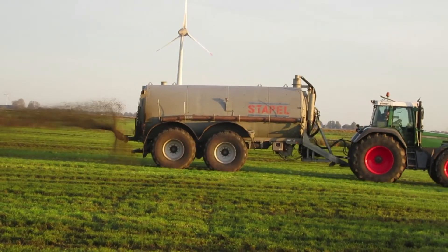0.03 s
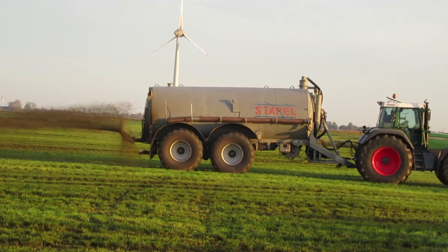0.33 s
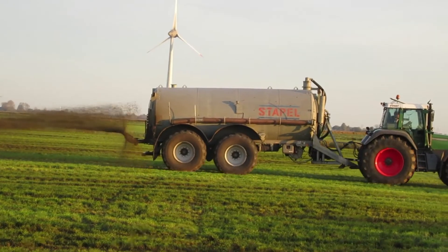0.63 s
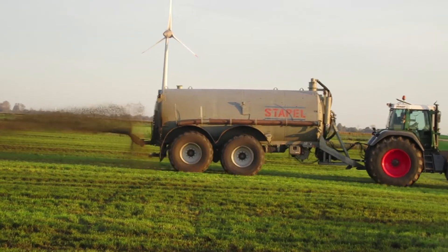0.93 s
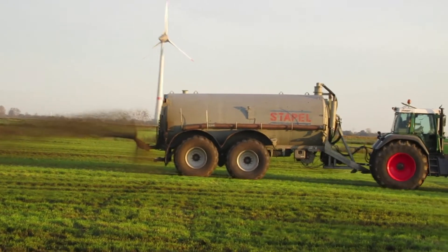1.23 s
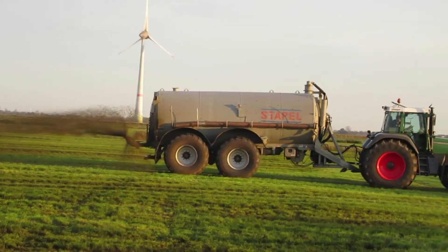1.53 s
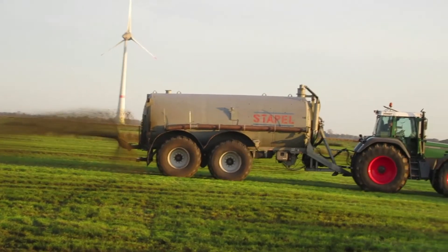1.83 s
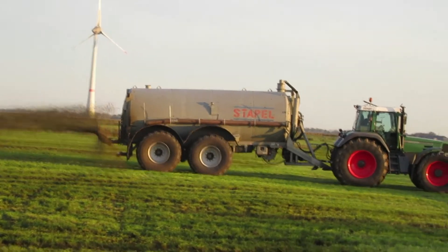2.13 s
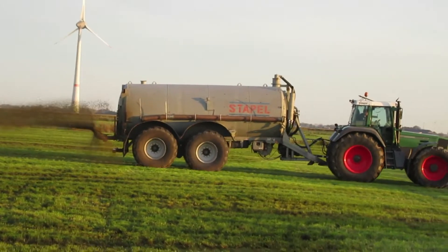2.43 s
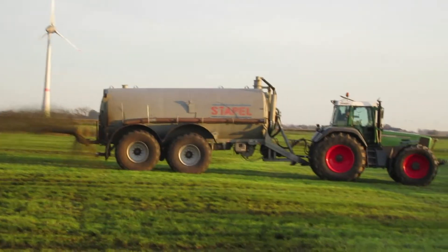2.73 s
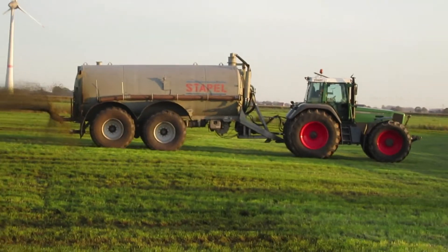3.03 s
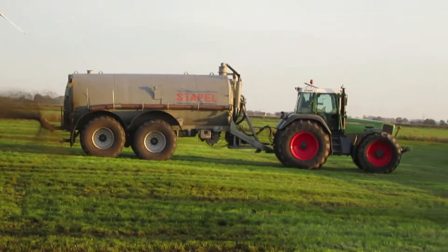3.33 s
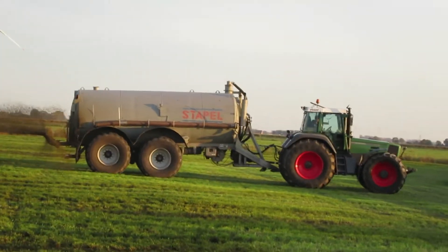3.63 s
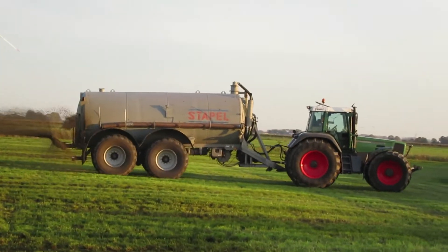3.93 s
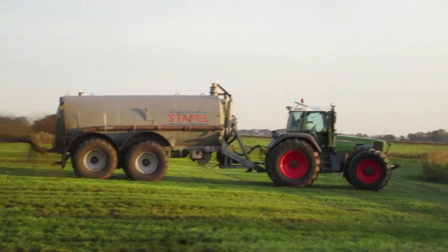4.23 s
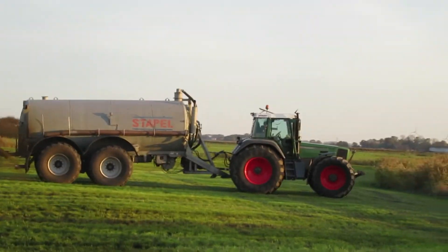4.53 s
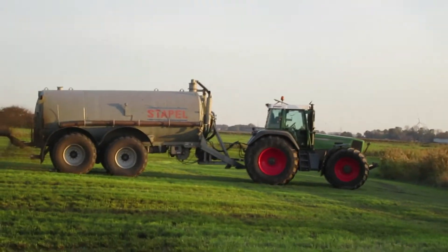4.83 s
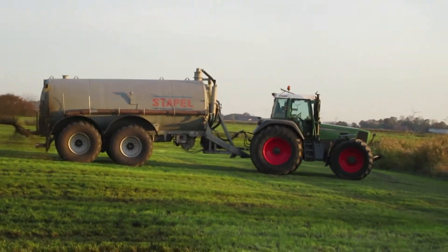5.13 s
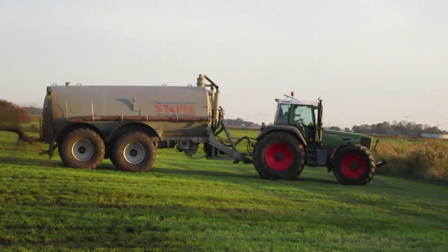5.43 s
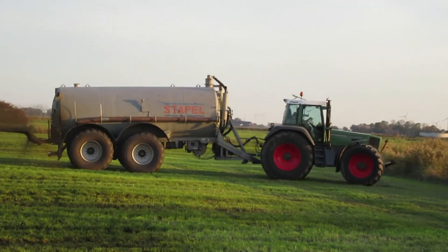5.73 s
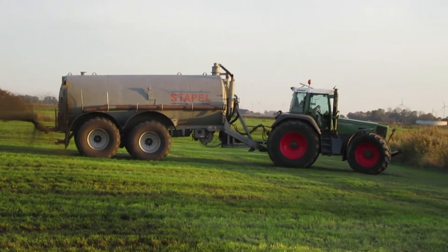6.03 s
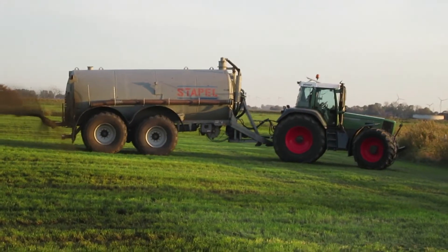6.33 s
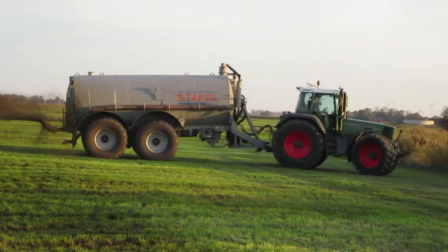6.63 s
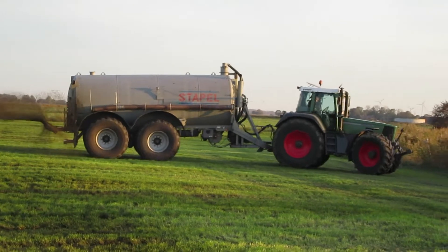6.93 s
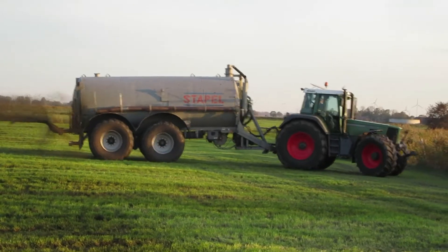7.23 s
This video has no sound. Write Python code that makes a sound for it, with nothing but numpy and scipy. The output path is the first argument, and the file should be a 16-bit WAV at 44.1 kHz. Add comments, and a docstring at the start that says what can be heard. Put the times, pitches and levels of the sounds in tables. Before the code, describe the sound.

Outdoors in a field, wind tumbles over the microphone in irregular gusts, rumbling and popping from start to finish. Behind it a tractor's diesel engine holds an even, rattling drone, with humming pump tones, gear whine that swells and fades, and the soft hiss of a tanker spraying slurry. Small close rustles and ticks appear now and then, and the strongest wind thumps make the level dip for a moment.

```python
"""Diesel clatter, pump hum, gear whine and spray hiss: a six-cylinder tractor pulls a slurry tanker
across a field at steady throttle. Firings rattle the block; the tones are locked to the crankshaft.
Wind eddies tumble over the microphone as gusts, rumble and pops; something rustles and ticks close by.
The hardest pops make a limiter duck everything, and the level creeps back up."""
import sys
import numpy as np
from scipy import signal
from scipy.fft import rfft, irfft, next_fast_len
from scipy.io import wavfile
from scipy.ndimage import uniform_filter1d, map_coordinates

SR = 44100
rng = np.random.default_rng(int(sys.argv[2]) if len(sys.argv) > 2 else 0)


def master_out(mix):
    """Clip the mix to full scale and print it as 16-bit PCM to the path in sys.argv[1]."""
    frames = np.transpose(np.atleast_2d(mix))
    ceiling = np.clip(frames, -1, 1)
    pcm = np.round(ceiling * 32767).astype(np.int16)
    wavfile.write(sys.argv[1], SR, pcm)


N = 330309

# Governed engine speed. Each row: time in seconds, speed in rpm.
ENGINE_RPM = [(0, 2086), (.4, 2087), (.75, 2069), (2.25, 2080), (3.1, 2069), (3.9, 2078), (5.5, 2072),
              (6, 2083), (6.8, 2063), (7.49, 2071)]
# Clatter loudness. Each row: time in seconds, relative level in dB.
CLATTER_DB = [(0, -43.5), (.7, -42.5), (1.2, -39.5), (1.75, -44.5), (2.5, -42), (3.3, -42), (3.85, -44),
              (5, -42.5), (6.1, -43.5), (6.5, -42.5), (7, -40.5), (7.49, -44.5)]
# Engine block response. Each row: frequency in Hz, gain in dB.
BLOCK_COLOUR = [(60, -2), (200, 14.5), (500, 2.5), (750, -0.5), (1000, 2), (1600, -2.5), (2400, -3.5),
                (3800, -12), (6000, -14), (8400, -25.5), (9800, -26.5), (11200, -37), (13300, -40.5),
                (15000, -51)]
# Ringing panels and pipes. Each row: centre in Hz, width in Hz, boost in dB.
PANEL_MODES = [(1800, 97, 4), (2340, 200, 3), (2820, 92, 5), (3047, 87, 6), (3440, 91, 3.5), (4590, 290, 5)]
# Vacuum pump and exhaust tones. Each row: periods per engine cycle, relative level in dB.
DRONE_TONES = [(4.5, -30.5), (6, -40), (9, -37.5), (13.5, -41), (18, -43), (30, -42), (31, -41.5),
               (35, -48.5), (36, -50.5), (54, -52), (57, -49.5), (58, -52.5), (101.5, -57), (125.5, -57)]
# Drone loudness. Each row: time in seconds, gain in dB.
DRONE_GAIN_DB = [(0, -6), (6.2, -4), (6.9, -3)]
# Low, middle and high gear mesh. Each row: periods per engine cycle, swell depth as a fraction.
GEAR_MESHES = [(56, .4), (83, .28), (111.3, .68)]
# Each mesh beams its own way in passing. Each row: time in seconds, low, middle, high in relative dB.
MESH_DB = [(0, -53, -50, -49.5), (.55, -51.5, -51, -45), (.8, -46, -48, -47.5), (1.12, -45.5, -47.5, -41),
           (1.9, -47, -54, -54), (2.35, -54, -57, -47.5), (3.1, -48.5, -49, -48.5), (4.201, -45, -50, -61),
           (4.9, -42, -45, -55), (5.8, -52, -57, -49.5), (6.6, -44, -42, -50.5), (7.49, -51, -48.5, -54)]
# Tanker hiss. Each row: time in seconds, spray level in dB, pump pipe level in dB.
HISS_DB = [(0, -56, -57), (.6, -52, -64), (1.15, -44.5, -53), (1.7, -57, -57), (2.5, -55, -53),
           (3.3, -49, -62), (4.1, -52.5, -57), (4.8, -51.5, -47), (5.3, -61, -54), (6.3, -52, -58),
           (7.49, -54.5, -49.5)]
# Spray and pump pipe spectra. Each row: frequency in Hz, gain in dB.
SPRAY_COLOUR = [(1500, -24), (3000, -1), (4000, -2), (4650, 1.5), (5300, -2), (7000, -19), (11000, -45),
                (15000, -56.5)]
PIPE_COLOUR = [(1800, -39.5), (2350, -7), (2510, 5.5), (2680, -10), (3400, -37), (12000, -64)]
# Breeze between gusts. Each row: time in seconds, level in dB.
BREEZE_DB = [(0, -30.5), (.45, -24), (1.6, -26), (2.6, -22.5), (3.15, -30), (3.6, -27), (4.3, -30.5),
             (5.15, -33.5), (5.7, -27), (6.5, -28.5), (7.1, -37.5), (7.49, -28.5)]
# Gusts. Each row: start in seconds, hold in seconds, level in dB.
WIND_GUSTS = [(0.122, 0.029, -23), (0.183, 0.054, -22.5), (0.317, 0.047, -24.5), (0.618, 0.12, -20),
              (0.765, .025, -24), (0.852, 0.035, -18), (.985, 0.02, -21.5), (1.095, 0.095, -23),
              (1.4, 0.13, -14.5), (1.52, 0.053, -11), (1.589, 0.1, -17), (1.744, 0.083, -18.5),
              (2.103, .14, -18), (2.23, 0.13, -28.5), (2.343, 0.063, -15.5), (2.423, 0.13, -16.5),
              (2.561, 0.1, -22), (2.934, 0.057, -21), (3.28, 0.092, -26.5), (3.459, 0.18, -15),
              (3.55, .13, -16.5), (3.738, 0.062, -13.5), (3.94, 0.032, -25), (4.121, 0.041, -23),
              (4.345, 0.13, -26), (4.574, 0.047, -29), (4.729, 0.13, -18.5), (4.886, 0.088, -13),
              (5.306, 0.058, -15.5), (5.391, 0.091, -15.5), (5.475, 0.058, -9.5), (5.567, 0.069, -17.5),
              (5.772, 0.12, -16), (5.925, 0.044, -17), (6.203, 0.11, -23), (6.356, 0.077, -19),
              (6.451, 0.067, -16.5), (6.68, 0.032, -12.5), (7.307, 0.042, -24)]
# Slow pressure swings. Each row: time in seconds, relative level in dB.
RUMBLE_DB = [(0, -38.5), (.4, -20.5), (.75, -29), (1.2, -17), (2, -31), (2.55, -21.5), (3.45, -24.5),
             (4.15, -24.5), (4.75, -20.5), (5.15, -30), (5.5, -20.5), (6.1, -35), (6.45, -24),
             (7.05, -37.5), (7.4, -27)]
# Their spectrum. Each row: frequency in Hz, gain in dB.
PRESSURE_COLOUR = [(15, -30), (30, -18), (50, -13.5), (80, 2), (125, -3), (190, -5.5), (350, -33),
                   (900, -76)]
# Head-on eddies. Each row: time in seconds, peak before limiting in dB, centre in Hz.
WIND_POPS = [(0.136, -12, 296), (.393, -4.5, 314), (.652, -10, 403), (.717, -9, 386), (.735, -14.5, 640),
             (.779, -10, 445), (.875, -6, 440), (0.89, -11.5, 310), (1.185, -9.5, 316), (1.218, -8, 312),
             (1.2804, 1.5, 556), (1.334, -8.5, 328), (1.421, -6.5, 248), (1.467, -3, 620), (1.519, -1, 496),
             (1.525, -12, 550), (1.662, -7.5, 320), (1.693, -7, 433), (1.895, -14.5, 324),
             (2.008, -18.5, 307), (2.105, -11, 636), (2.145, -9, 520), (2.26, -13, 280), (2.369, -9, 422),
             (2.479, -8.5, 480), (2.497, -4.5, 350), (2.522, -3, 320), (2.651, -8.5, 287),
             (2.855, -8.5, 250), (2.958, -11.5, 424), (3.025, -10, 293), (3.302, -5, 271),
             (3.403, -13, 227), (3.462, -6, 283), (3.495, -5, 246), (3.529, -2, 510), (3.533, .5, 554),
             (3.646, -6, 368), (3.678, -13.5, 290), (3.75, -6, 500), (3.793, -7, 380), (4.16, -12.5, 430),
             (4.428, -8, 310), (4.487, -11, 417), (4.63, -10, 258), (4.749, -14.5, 356), (4.886, -2, 450),
             (4.915, 2, 258), (4.958, 1, 585), (4.967, 1, 590), (5.222, -17, 427), (5.348, -5.5, 302),
             (5.411, 0.5, 297), (5.431, -8.5, 600), (5.484, -4, 425), (5.496, -5, 257), (5.518, -6, 616),
             (5.583, -3.5, 455), (5.689, -9, 420), (5.79, -11.5, 597), (5.799, -10, 557), (5.875, -12, 612),
             (5.89, -17.5, 695), (5.957, -7.5, 400), (6.214, -8, 440), (6.378, -10.5, 466),
             (6.415, -9.5, 450), (6.494, -12, 500), (6.6795, 4.5, 380), (6.795, -13.5, 270),
             (6.891, -10.5, 254), (7.351, -11, 314)]
# Close rustles. Each row: peak time in seconds, level in dB, Gaussian width in seconds, centre in Hz.
NEAR_RUSTLES = [(1.932, -42.5, 0.017, 4520), (1.997, -57, 0.034, 6500), (4.702, -47.5, 0.026, 7500),
                (4.777, -52.5, 0.067, 6700), (4.828, -38.5, 0.0092, 3800)]
# Close ticks. Each row: start in seconds, relative level in dB, ring frequency in Hz.
NEAR_TICKS = [(1.934, -33, 6000), (1.989, -31, 5900), (4.489, -31, 5500), (4.677, -31, 6500),
              (4.6825, -28, 7500), (4.688, -34, 7040), (4.6997, -31, 6200), (4.819, -31, 7050),
              (4.951, -31, 6060), (6.362, -34, 3700), (6.621, -23, 5400), (6.694, -31, 6300)]
# Rustle and tick spectra. Each row: frequency in Hz, gain in dB.
RUSTLE_COLOUR = [(1000, -30), (2500, 11), (3800, -1), (5500, 3), (8400, -6), (10000, -3.5), (11500, -25),
                 (15000, -29)]
SNAP_COLOUR = [(2000, -13), (5000, 6), (10000, -7), (12000, -37)]


def amp(db):
    """Decibels to gain."""
    return 10 ** (np.asarray(db) / 20)


def unit(x):
    """x at rms 1."""
    return x / np.sqrt(np.mean(x ** 2) + 1e-20)


def clock():
    """Sample times in seconds."""
    return np.arange(N) / SR


def curves(rows):
    """One value per sample for each column after the time."""
    times_s, *columns = np.transpose(rows)
    return [np.interp(clock(), times_s, column) for column in columns]


def wobble(rate_hz):
    """Smooth random curve, rate_hz knots a second."""
    return map_coordinates(rng.standard_normal(int(N * rate_hz / SR) + 4), [clock() * rate_hz])


def filtered(x, response):
    """x through a gain given as a function of Hz."""
    size = next_fast_len(N + SR // 2)
    return irfft(rfft(x, size) * response(np.fft.rfftfreq(size, 1 / SR)), size)[:N]


def coloured(x, colour):
    """x through (Hz, dB) points joined on a log axis."""
    points_hz, db = np.transpose(colour)
    return filtered(x, lambda hz: amp(np.interp(np.log(hz + 1), np.log(points_hz), db)))


def noise(colour):
    """Coloured noise of rms 1."""
    return unit(coloured(rng.standard_normal(N), colour))


def diesel_clatter(cycle, cylinders=6, decay_firings=.99, scatter_db=1.5, flutter_db=.54):
    """Each firing, of uneven strength, rattles the block and rings the panels."""
    firing = cycle * cylinders
    strength = amp(scatter_db * rng.standard_normal(SR)[firing.astype(int)])
    knocks = 1 + .8 * strength * np.exp(-(firing % 1) / decay_firings)
    # valves and injectors strike alike in every cycle
    valves = map_coordinates(rng.standard_normal(SR), [(cycle % 1) * N / cycle[-1]])
    rattle = coloured(knocks * (rng.standard_normal(N) + .54 * valves), BLOCK_COLOUR)
    ringing = filtered(rattle, lambda hz: amp(sum(
        db / (1 + (2 * (hz - mode_hz) / width_hz) ** 2) for mode_hz, width_hz, db in PANEL_MODES)))
    return amp(curves(CLATTER_DB)[0] + 8 + flutter_db * wobble(19)) * unit(ringing)


def pump_drone(cycle, waver_db=1.0, drift_rad_per_order=.022):
    """Pump and exhaust tones locked to the crankshaft, wavering in the moving air."""
    gain_db, = curves(DRONE_GAIN_DB)
    tones = np.zeros(N)
    for order, db in DRONE_TONES:
        phase = 2 * np.pi * (order * cycle + rng.random())
        phase += drift_rad_per_order * min(order, 36) * wobble(9)
        tones += np.sqrt(2) * amp(db + gain_db + waver_db * wobble(6)) * np.sin(phase)
    return tones


def gear_whine(cycle, wander_rad=1.6):
    """Meshing teeth whine; off-centre gears swell and slide about once per engine cycle."""
    whine = np.zeros(N)
    for (order, depth), db in zip(GEAR_MESHES, curves(MESH_DB)):
        runout = depth * np.sin(2 * np.pi * cycle + wander_rad * wobble(7))
        jitter_rad = .68 * depth * wobble(60)
        teeth = np.sin(2 * np.pi * order * cycle + runout + jitter_rad)
        flutter_db = 2.8 * depth * wobble(14)
        whine += amp(db - .5) * unit((1 - runout) * teeth * amp(flutter_db))
    return whine


def tanker_hiss(cycle, surge_db=.4, spatter_db=3.5):
    """The slurry fan spatters, throbbing once per engine cycle; air rings in the pump pipe."""
    spray_db, pipe_db = curves(HISS_DB)
    throb = 1 + .25 * np.cos(2 * np.pi * cycle)
    spray = unit(throb * amp(spatter_db * wobble(500)) * noise(SPRAY_COLOUR))
    return amp(spray_db + surge_db * wobble(12)) * spray + amp(pipe_db) * noise(PIPE_COLOUR)


def wind_strength_db(attack_s=.014, release_s=.016, wake_s=.012):
    """Gusts rise, hold and die away over the breeze; a puff of rough air trails each pop."""
    t = clock()
    power = amp(curves(BREEZE_DB)[0]) ** 2
    for start_s, hold_s, db in WIND_GUSTS:
        rise = np.clip((t - start_s) / attack_s + .5, 0, 1)
        fall = np.exp(-np.clip((t - start_s - hold_s) / release_s, 0, 20))
        power += (amp(db) * rise * fall) ** 2
    lag = np.arange(-SR // 20, SR // 20)
    wake = np.exp(-(lag / SR / wake_s - .5) ** 2)
    for time_s, pop_db, _ in WIND_POPS:
        wake_db = min(pop_db - 15.5, -18)
        power[round(time_s * SR) + lag] += amp(wake_db) ** 2 * wake
    return 10 * np.log10(power)


def swirl(hz, lag_samples):
    """Pressure of a passing eddy: a push, then a pull, of peak 1."""
    phase = 2 * np.pi * hz * lag_samples / SR
    return -phase * np.exp((1 - phase ** 2) / 2)


def eddies(wind_db, count=9000, centre_hz=185, scatter_db=5.5, flurry_db=.56, clump_db=1.57):
    """Eddies hit the microphone; in a stronger gust they pass faster and sound brighter."""
    gust_db = wind_db + flurry_db * wobble(24)
    at = rng.integers(0, N, count)
    pitch, size, sign = rng.standard_normal((3, count))
    speedup = amp(.38 * (gust_db[at] - gust_db.mean()))
    hz = np.clip(centre_hz * speedup * np.exp(.44 * pitch), 95, 640)
    strength = np.sign(sign) * amp(scatter_db * size) * (hz / centre_hz) ** .069
    half_samples = 230
    lag = np.arange(-half_samples, half_samples)
    puffs = strength[:, None] * swirl(hz[:, None], lag)
    slots = at[:, None] + lag + half_samples
    flow = np.bincount(slots.ravel(), puffs.ravel(), N + half_samples)[half_samples:][:N]
    flow = coloured(flow, [(40, -8), (110, -3.5), (240, 1.5), (420, .5), (800, -2)])
    # level out and saturate, so the gust sets the strength
    power = uniform_filter1d(uniform_filter1d(flow ** 2, size=1300), size=900)
    flow = np.tanh(flow / np.sqrt(np.abs(power) + 1e-9) / 3)
    flow = coloured(flow, [(1200, -.5), (2000, -1.5), (4000, -25.5)])
    return amp(gust_db + clump_db * wobble(45)) * unit(flow)


def rumble(lump_db=3):
    """Large slow eddies roll over the microphone in lumps."""
    lumps = amp(lump_db * wobble(16))
    return amp(curves(RUMBLE_DB)[0] - 3) * unit(lumps * noise(PRESSURE_COLOUR))


def sputter(wind_db, count=70, centre_hz=420, above_wind_db=3, max_db=-10, half_samples=200):
    """Lesser pops strike at random, harder in stronger wind."""
    at = rng.integers(half_samples, N - half_samples, count)
    scatter_db, pitch, sign = rng.standard_normal((3, count))
    lag = np.arange(-half_samples, half_samples)
    hz = centre_hz * np.exp(.23 * pitch)
    strength = np.sign(sign) * amp(np.minimum(wind_db[at] + above_wind_db + scatter_db, max_db))
    puffs = strength[:, None] * swirl(hz[:, None], lag)
    return np.bincount((at[:, None] + lag).ravel(), puffs.ravel(), N)


def pops():
    """Single eddies strike the microphone port head on."""
    lag = np.arange(-SR // 100, SR // 100)
    pressure = np.zeros(N)
    for time_s, db, hz in WIND_POPS:
        pressure[round(time_s * SR) + lag] += amp(db) * swirl(hz, lag)
    return pressure


def rustles(grain_db=3, width_octaves=.73):
    """Short swells of crisp, grainy band noise."""
    grain = unit(amp(grain_db * wobble(350)))
    swells = np.zeros(N)
    for peak_s, db, width_s, centre_hz in NEAR_RUSTLES:
        envelope = np.exp(-((clock() - peak_s) / width_s) ** 2 / 2)
        band = filtered(noise(RUSTLE_COLOUR),
                        lambda hz: np.exp(-(np.log2((hz + 1) / centre_hz) / width_octaves) ** 2 / 2))
        swells += amp(db) * envelope * unit(band)
    return grain * swells


def ticks(ring_s=.00018, crackle_s=.0004):
    """Dry snaps ring for about one period, with a brief crackle behind."""
    t = np.arange(SR // 100) / SR
    snaps = np.zeros(N)
    for start_s, db, hz in NEAR_TICKS:
        snap = 2 * np.exp(-t / ring_s) * np.sin(2 * np.pi * hz * t)
        crackle = np.exp(-t / crackle_s) * rng.standard_normal(len(t))
        snaps[round(start_s * SR):][:len(t)] += amp(db) * (snap + crackle)
    return coloured(snaps, SNAP_COLOUR)


def limiter(x, threshold_db=-3, release_db_per_s=12, attack_samples=45):
    """Gain takes a millisecond to drop, so a sudden pop overshoots; it climbs back steadily."""
    over_db = np.maximum(20 * np.log10(np.abs(x) + 1e-9) - threshold_db, 0)
    climb_db = release_db_per_s * clock()
    duck_db = np.maximum.accumulate(over_db + climb_db) - climb_db
    attack = np.hanning(attack_samples)
    return x * amp(-signal.lfilter(attack / attack.sum(), 1, duck_db))


def scene():
    """Tractor and tanker in the open, wind at the microphone; mono."""
    cycle = np.cumsum(curves(ENGINE_RPM)[0]) / (2 * 60 * SR)  # two crank turns per engine cycle
    tractor = diesel_clatter(cycle) + pump_drone(cycle) + gear_whine(cycle) + tanker_hiss(cycle)
    wind_db = wind_strength_db()
    wind = eddies(wind_db) + sputter(wind_db) + pops() + rumble()
    return (tractor + wind + rustles() + ticks())[None]


def record(dry, cutoff_hz=14950):
    """Limiter, hard clipping that cracks on overshoots, then a low-pass."""
    clipped = np.clip(limiter(dry[0]), -.97, .97)
    return filtered(clipped, lambda hz: hz < cutoff_hz)[None]


dry = scene()
out = record(dry)
master_out(out)
```